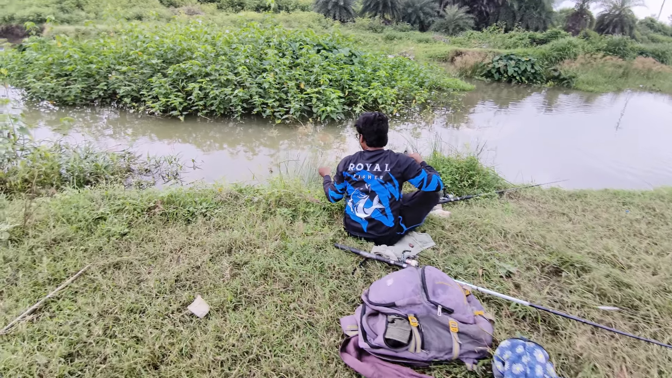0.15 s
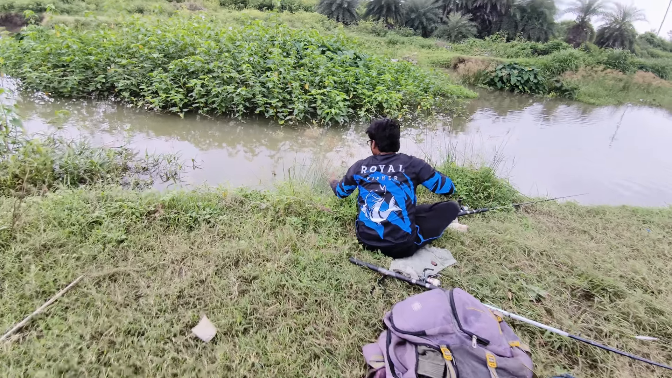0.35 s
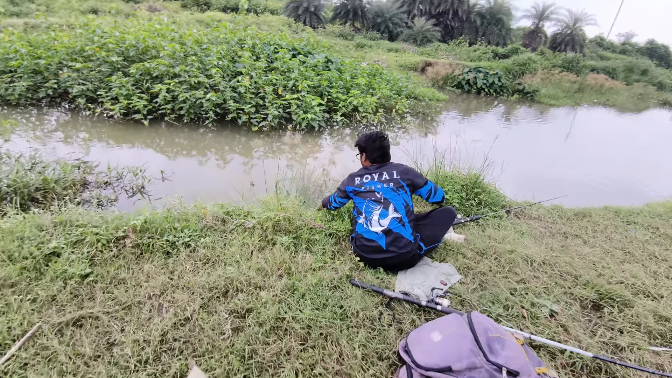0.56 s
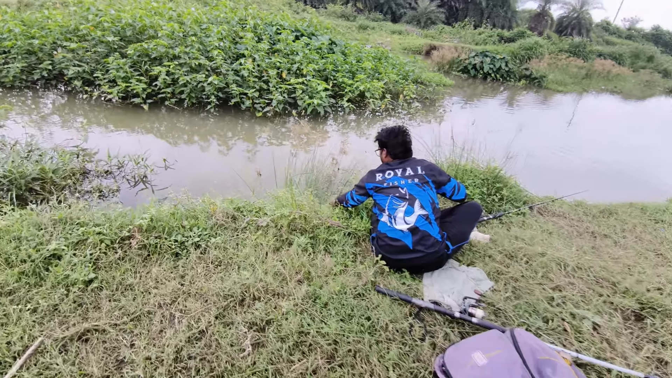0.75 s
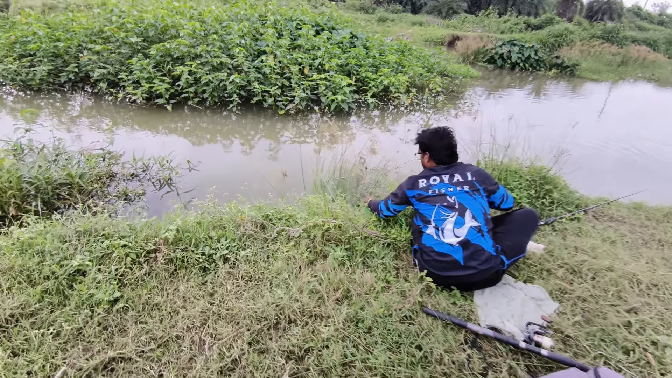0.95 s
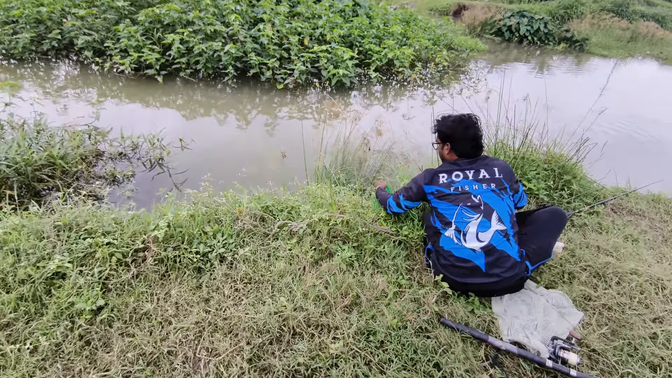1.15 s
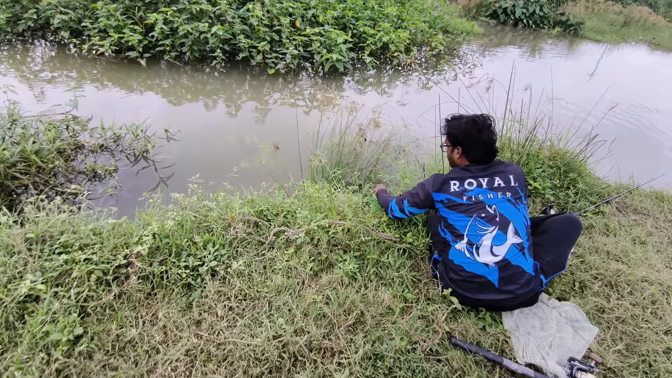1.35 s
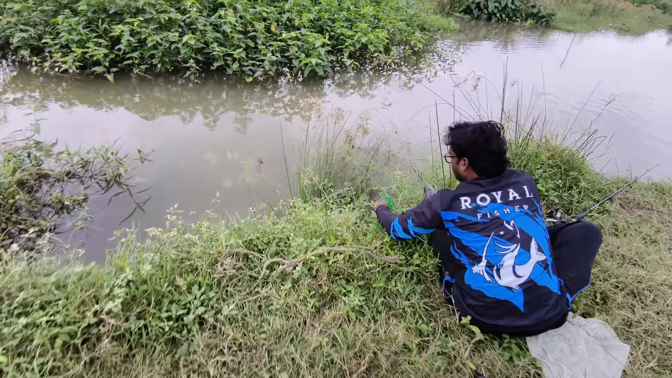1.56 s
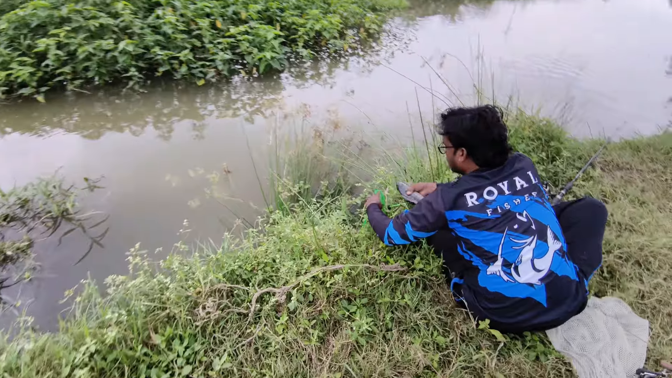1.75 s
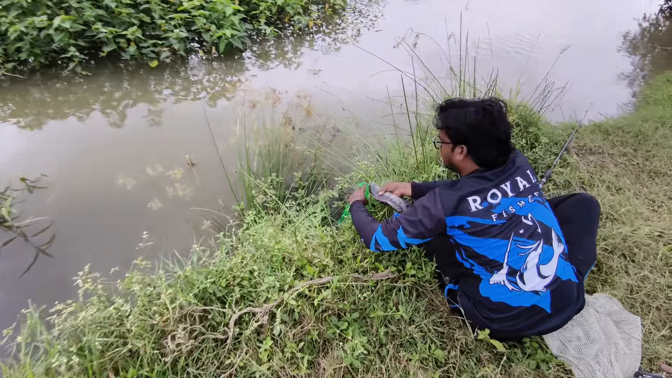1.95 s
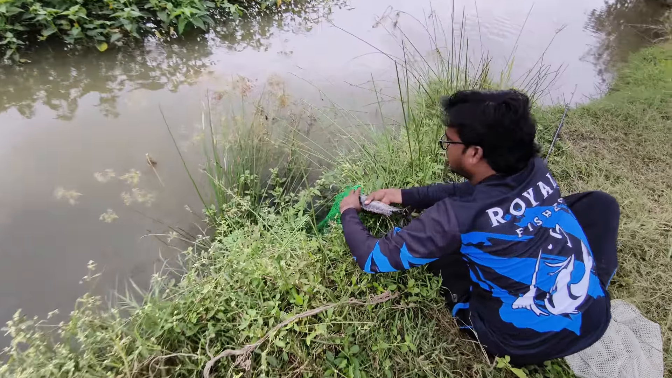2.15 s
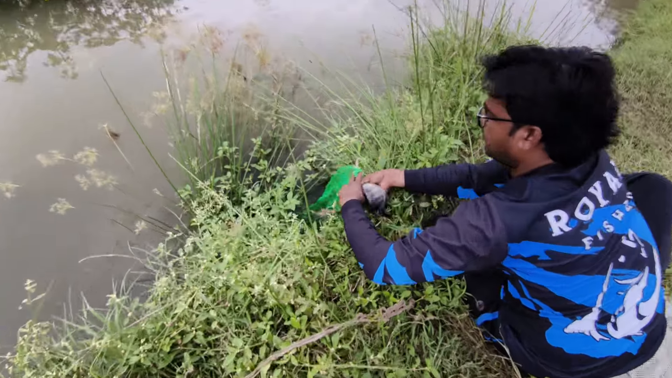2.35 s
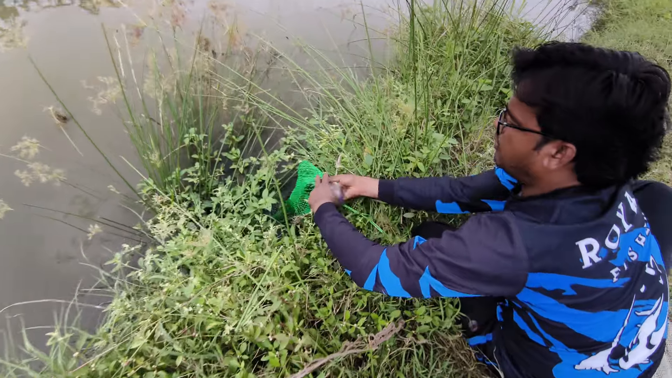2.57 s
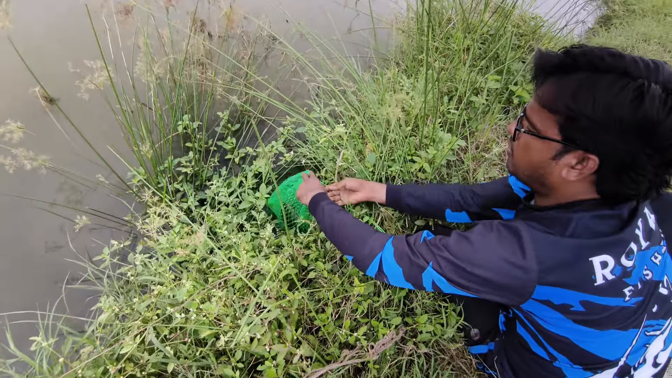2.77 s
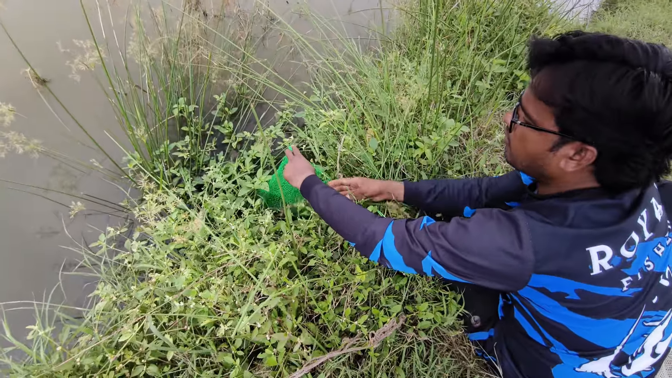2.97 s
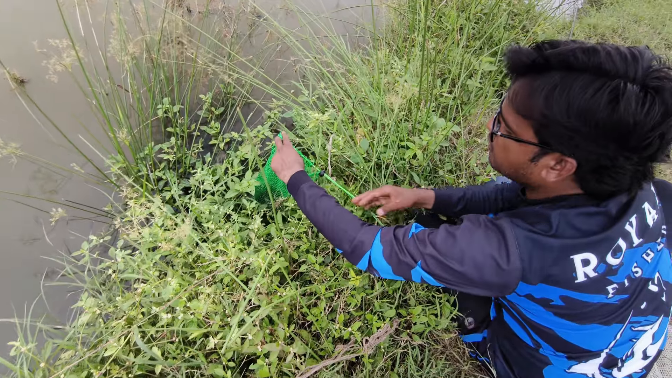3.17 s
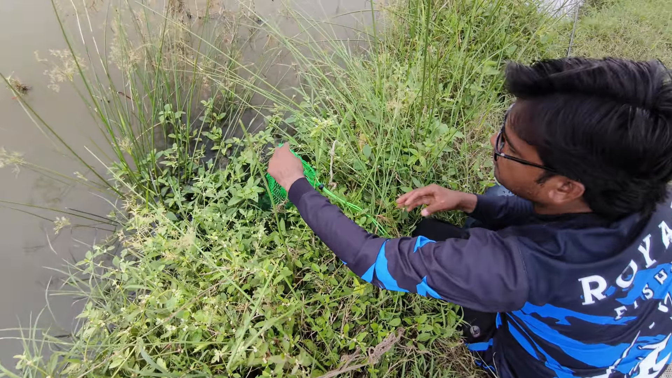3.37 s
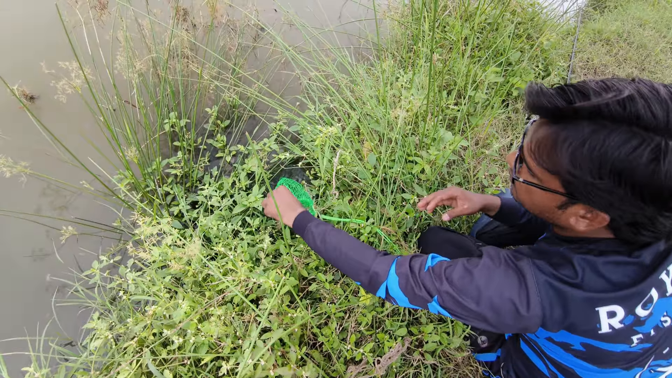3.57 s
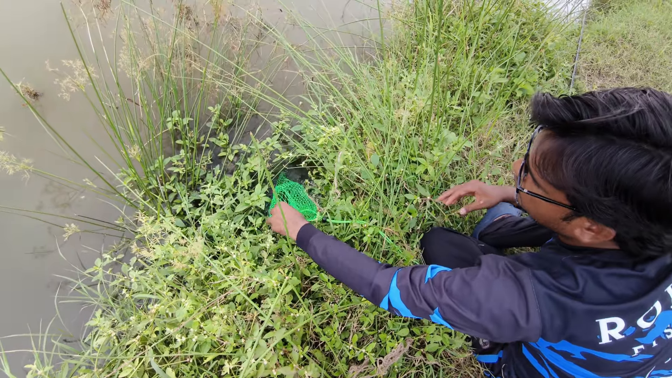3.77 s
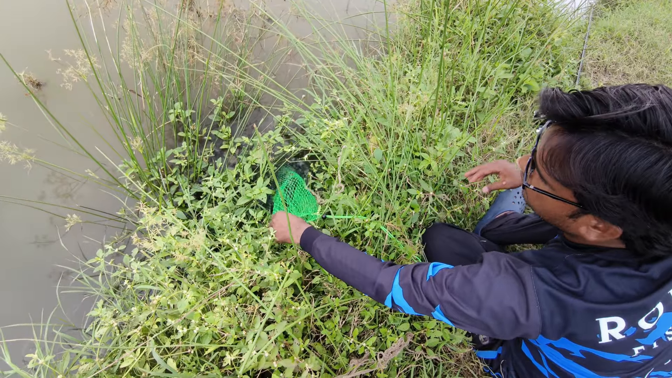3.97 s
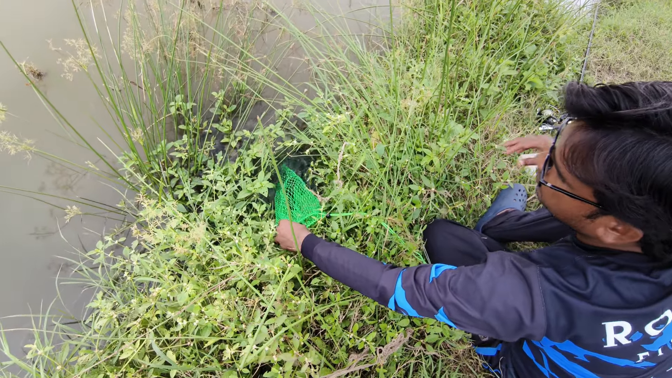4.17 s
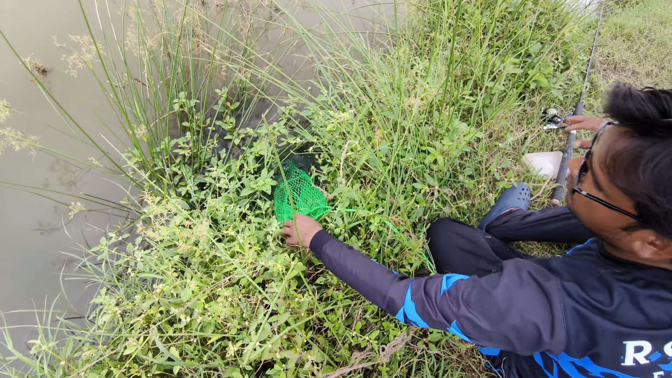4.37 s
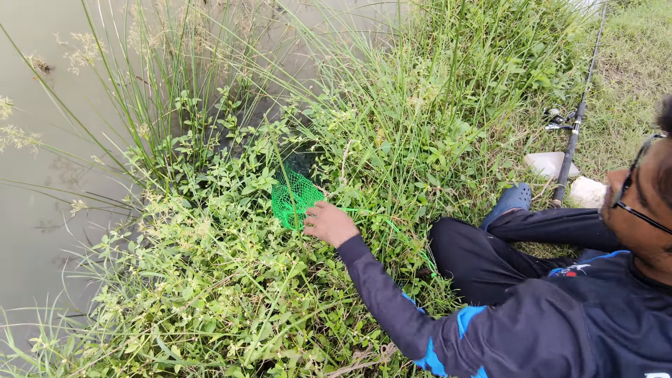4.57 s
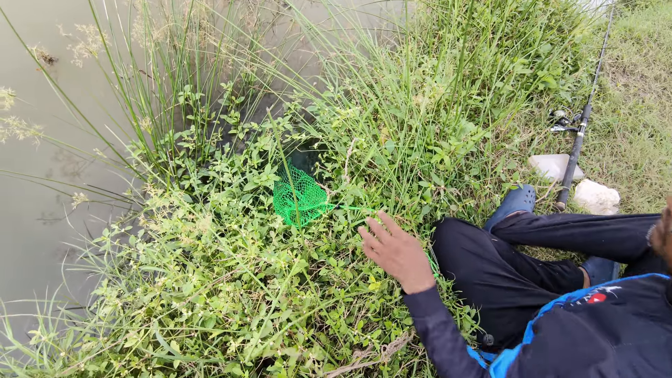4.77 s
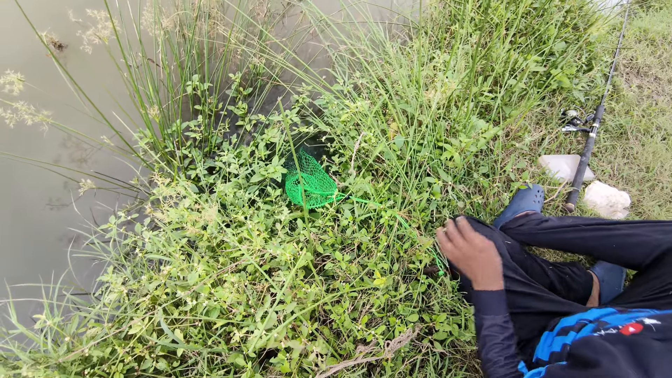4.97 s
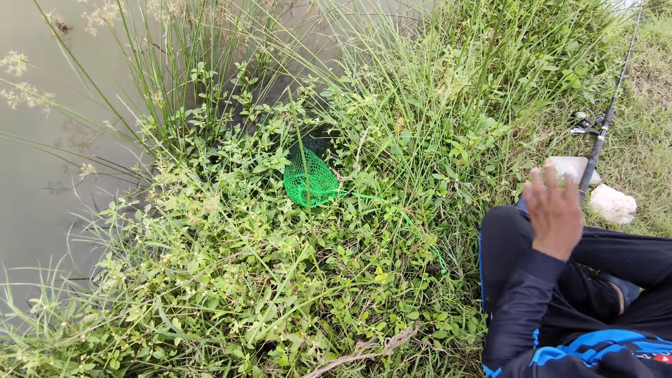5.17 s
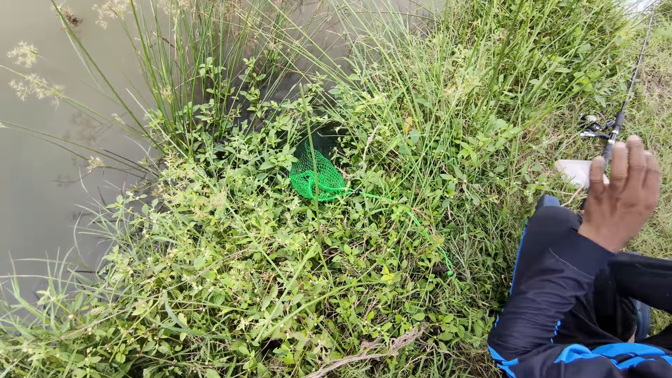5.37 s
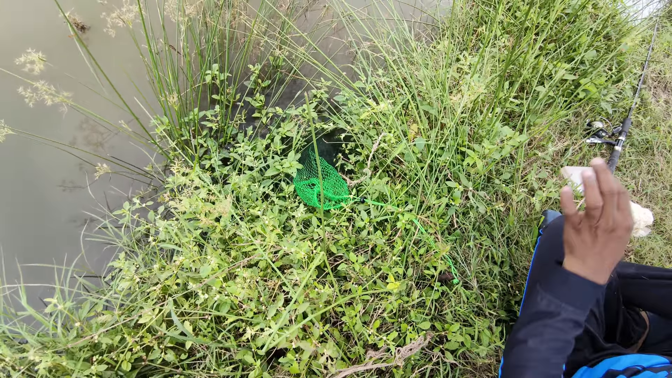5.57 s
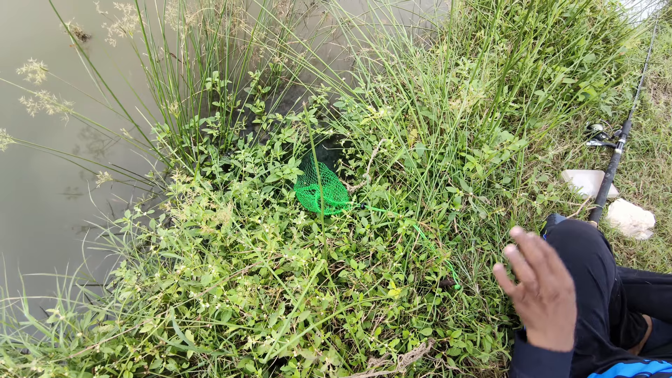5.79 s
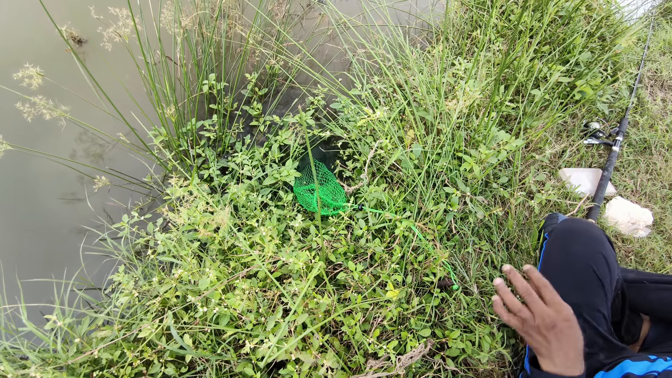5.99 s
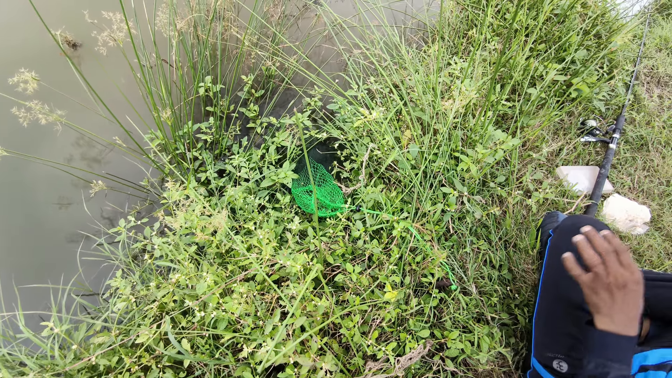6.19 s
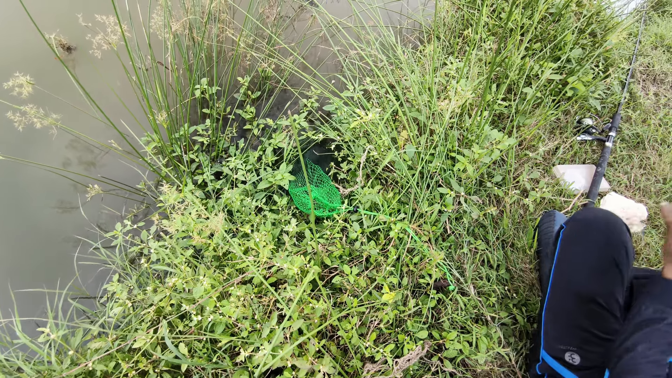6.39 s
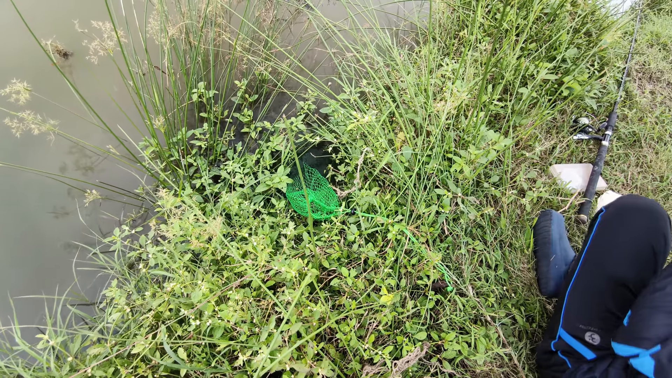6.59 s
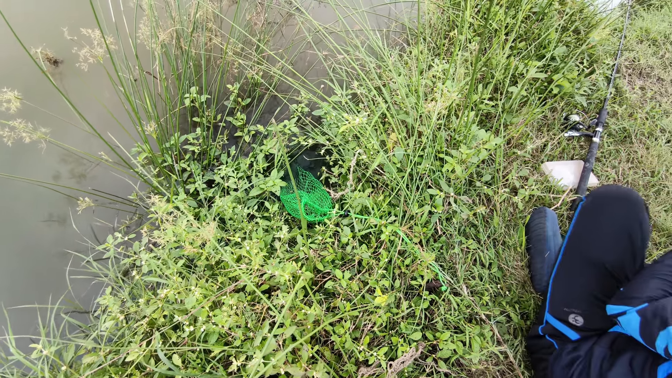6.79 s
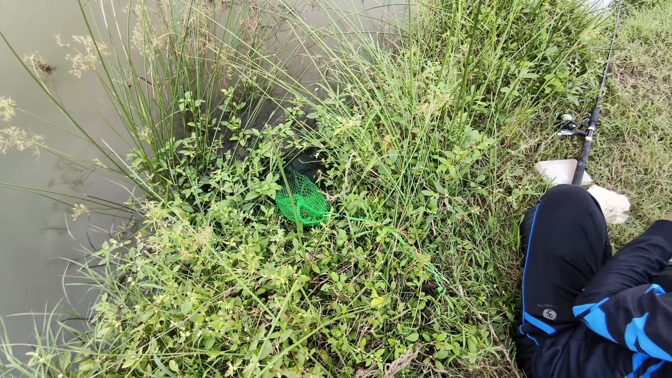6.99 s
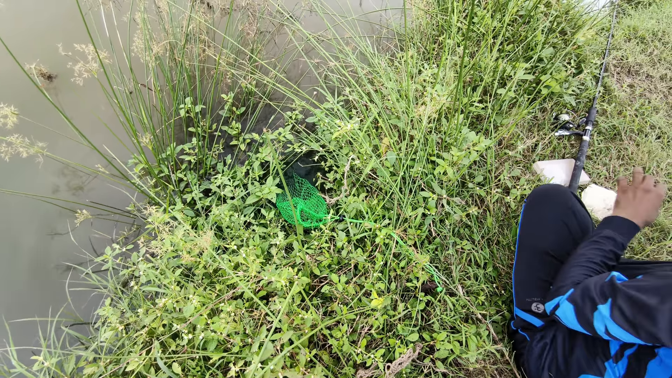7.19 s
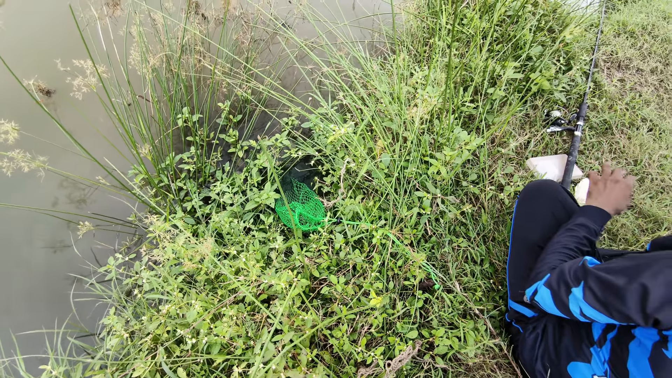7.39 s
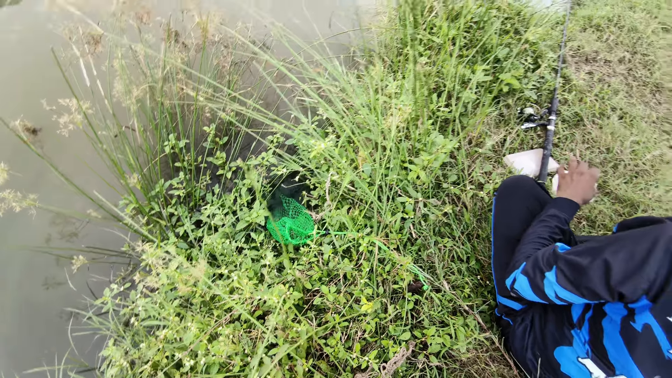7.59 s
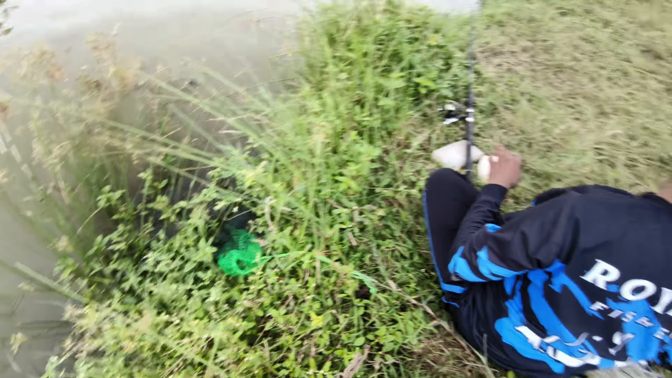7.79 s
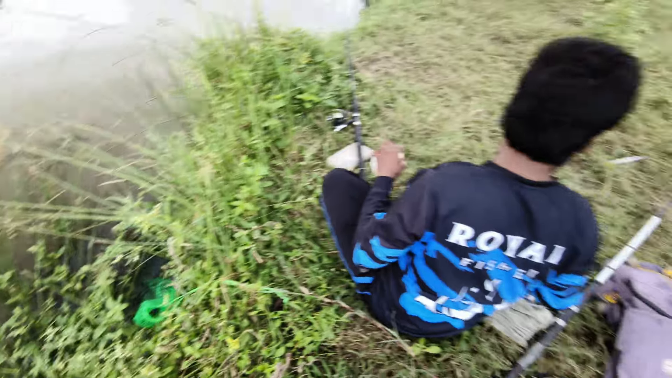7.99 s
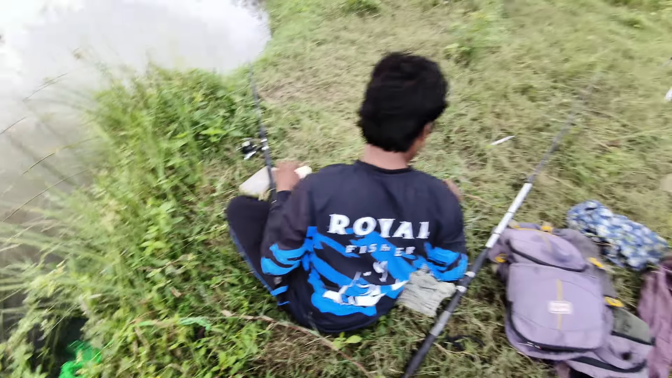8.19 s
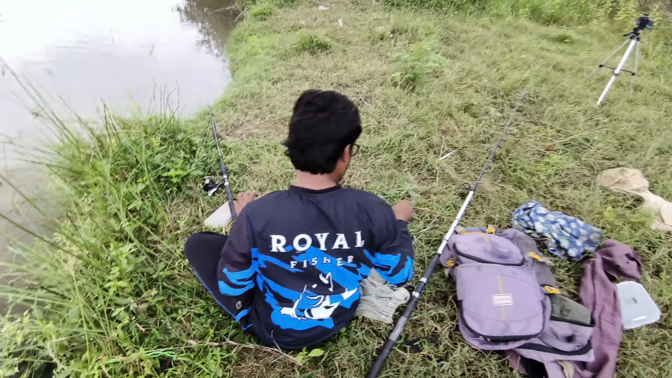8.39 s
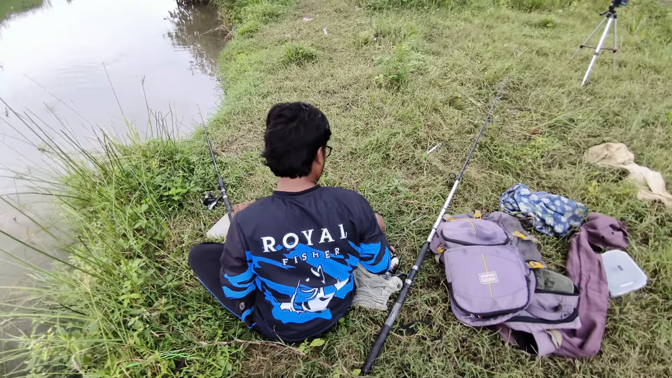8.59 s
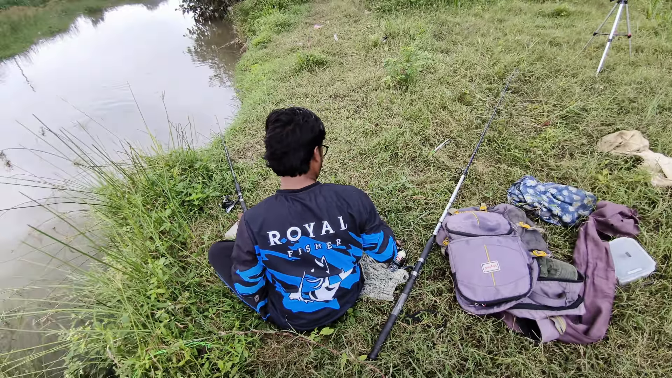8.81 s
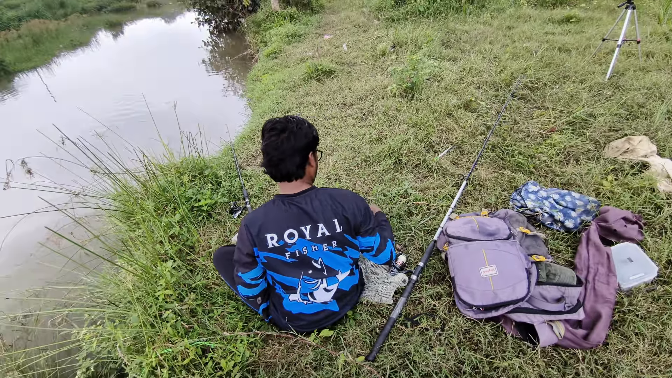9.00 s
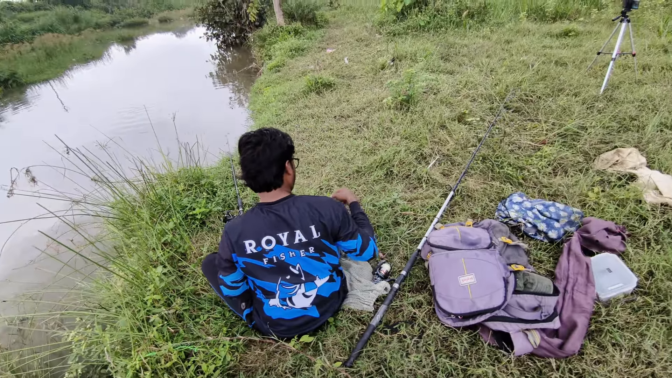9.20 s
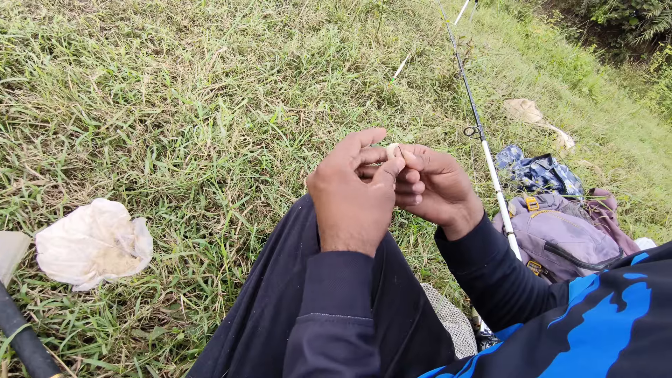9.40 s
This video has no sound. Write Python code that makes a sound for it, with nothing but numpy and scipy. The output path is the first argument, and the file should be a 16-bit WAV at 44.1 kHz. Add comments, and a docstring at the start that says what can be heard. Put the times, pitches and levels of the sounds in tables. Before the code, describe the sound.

Close sleeves swish through grass, wet slaps and bubbling splashes burst out, then pulsing cricket trills and faint bird calls continue in open air.

```python
"""Crickets trill in the grass of a pond bank, mostly to the right: close ones as gliding tones, far ones as noise.
To the left a fish slaps at a net basket (noise bursts) and splashes in the shallows (ringing bubbles, spray).
An angler's sleeves rustle the grass close by (crackling noise); stems and tackle tick.
Small birds chirp farther off (arched tones), with calls and hoots from beyond the bushes.
Light wind rumbles on the microphones under an open-air hush (shaped noise)."""
import sys
import numpy as np
from scipy import signal
from scipy.fft import rfft, irfft, next_fast_len
from scipy.io import wavfile
from scipy.ndimage import uniform_filter1d, map_coordinates

SR = 44100
rng = np.random.default_rng(int(sys.argv[2]) if len(sys.argv) > 2 else 0)


def generate_wav(sig):
    """Save sig (samples, or channels by samples) to the path in sys.argv[1] as 16-bit PCM at SR."""
    pcm = np.round(np.clip(np.atleast_2d(sig).T, -1, 1) * 32767).astype(np.int16)
    wavfile.write(sys.argv[1], SR, pcm)


N = 416744

STROKE_RATE = 26.6  # wing strokes a second
# overtones of the close crickets, which beam narrowly and come and go as the listener turns:
# t/s, level/dB added to each cricket's own overtone level
OVERTONE_BEAM = [(0, 11), (5.3, -2), (6, -2.5), (6.65, -28), (7, -7), (7.6, -2), (8.2, 14), (8.7, -2)]


def cricket(lag, pitch_hz, fall_hz, width, overtone_db, scatter_db, spread):
    """Each wing stroke is a short tone that swells, then sags in pitch and dies as the scraper stops on the file."""
    beat = STROKE_RATE * np.arange(N) / SR - lag + 0.04 * wobble(24)
    within = (beat + .5) % 1 - .5  # place in the stroke, -0.5 to 0.5
    swell = np.exp(-.5 * (within / (width * (1 - within))) ** 2)
    closing = np.abs(np.cos(np.pi * within)) ** .5  # silent between strokes
    stroke = swell * closing * amp(1.9 * wobble(25))
    hz = pitch_hz - fall_hz * np.tanh(5 * within) + 18 * wobble(60)
    rasp = .045 * wobble(2200)  # uneven teeth jitter the phase
    phase = 2 * np.pi * np.cumsum(hz) / SR + rasp
    overtone = amp(overtone_db + curves(OVERTONE_BEAM)[0]) * np.sin(2 * phase)
    return through_grass(stroke * (np.sin(phase) + overtone), scatter_db, spread)


# close crickets together, at the moving listener: t/s, level/dB
CRICKET_LEVEL = [(0.0, -52), (0.8, -57), (1.75, -51), (1.95, -56.5), (2.38, -46.5), (2.52, -52),
                 (3.15, -41), (4.45, -42), (4.85, -49), (5.5, -43.5), (5.75, -48.5), (6.55, -52.5),
                 (6.66, -54.5), (7.08, -43.5), (8.08, -45), (8.3, -54), (8.85, -51), (9.45, -64)]
# how far each cricket falls behind the common beat (negative is ahead):
# t/s, high one/cycles, middle one/cycles, low one/cycles
CRICKET_LAG = [(0, -.22, -.22, 0), (1.2, -.5, -.4, -.03), (1.8, -.8, -.1, 0), (2.6, -.8, .15, .1),
               (3.3, -1.13, -.05, .1), (4.4, -1.43, -.3, -.03), (5.3, -1.56, -.45, -.11),
               (6, -1.85, -.3, .06), (7.1, -1.9, .05, .12), (7.9, -2.02, 0, .16), (8.7, -2.15, -.15, -.12),
               (9.45, -2.18, -.18, -.15)]
# where they lie as the listener turns: t/s, left over right/dB
CRICKET_BEARING = [(0.0, -8.86), (1.3, 1), (2.3, -15.5), (3.4, -12.29), (6.0, -12), (6.6, -5.45),
                   (6.85, -12.5), (8.0, -13), (8.5, -4), (9.45, -6)]
# which one is nearest, against the middle one: t/s, high one's level/dB, low one's level/dB
CRICKET_NEARNESS = [(.45, -12, -3), (1.1, 0.5, -0.5), (1.75, 6, 12), (2.25, -15, -4), (2.95, 19, 6),
                    (3.5, 3.5, 6.5), (6.2, 1, 3), (6.6, 9.5, -1.5), (6.85, 4.5, 14.5), (7.55, -4, 6.5),
                    (8.05, -4.5, -8.5), (8.7, -9.5, -26)]
PAUSE_S, RESUME_S, PAUSE_FADE_S = 6.58, 7.12, 0.025  # the high cricket rests once


def crickets():
    """Three neighbours trill at nearly the same beat, each on its own pitch; they share the loudness by nearness."""
    level_db, = curves(CRICKET_LEVEL)
    pan_db, = curves(CRICKET_BEARING)
    high_db, low_db = curves(CRICKET_NEARNESS)
    high_lag, middle_lag, low_lag = curves(CRICKET_LAG)
    t = np.arange(N) / SR
    singing = np.clip(np.maximum(PAUSE_S - t, t - RESUME_S) / PAUSE_FADE_S + .5, 0, 1)
    high_gain, low_gain = singing * amp(high_db), amp(low_db)
    high = high_gain * cricket(high_lag, pitch_hz=7562, fall_hz=11, width=0.2,
                               overtone_db=-15.5, scatter_db=-21, spread=0.0074)
    middle = cricket(middle_lag, pitch_hz=7337, fall_hz=63.0, width=0.3,
                     overtone_db=-25.5, scatter_db=-8.0, spread=0.012)
    low = low_gain * cricket(low_lag, pitch_hz=7121, fall_hz=185, width=0.21,
                             overtone_db=-29, scatter_db=-7.5, spread=.01)
    total_gain = np.sqrt(high_gain ** 2 + 1 + low_gain ** 2)
    return amp(level_db) * (high + middle + low) / total_gain * panned(pan_db)


def through_grass(x, scatter_db, spread, count=6):
    """A direct path plus detours of up to spread/s off stems and ground, drifting as the listener moves; levelled."""
    ears = np.array([x, np.roll(x, 1)])
    for ear in ears:
        for delay in spread * (np.arange(count) + rng.random(count)) / count:
            ear += amp(scatter_db) * wobble(3) * np.roll(x, int(delay * SR))
    power = uniform_filter1d(np.mean(ears ** 2, axis=0), SR // 4)
    return ears / np.sqrt(np.abs(power) + 1e-9)


# colour of the far crickets: f/Hz, relative level/dB per Hz
CHORUS_COLOUR = [(5800, -27.5), (6500, -14.5), (7000, -2.5), (7350, -1.5), (7700, -6), (8200, -17),
                 (8900, -35.5)]


def chorus():
    """Many far crickets merge into a shimmering haze around the near ones."""
    shimmer_db = 2 * wobble(50)
    haze = coloured(patchy(rng.standard_normal((2, N)), depth_db=0.5), CHORUS_COLOUR)
    return amp(-65.0 + shimmer_db) * haze * panned(-8.0)


def fish(lead=0.00022):
    """The basket lies to the left, so its sounds reach the left microphone first (lead in s)."""
    early_left = lambda hz: np.exp(1j * np.pi * hz * lead * np.array([[1], [-1]]))
    return filtered(slaps() + water(), early_left)


# slaps of the fish against hand, grass and net, levels before the attack:
# t/s, thump level/dB, smack level/dB, crack level/dB, t60/s (thump: twice that), left over right/dB
FISH_SLAPS = [(0.537, -54.5, -46, -67, 0.12, -23), (.988, -65, -37, -36.5, 0.044, 2),
              (2.467, -58, -26.5, -27, 0.048, -4), (2.48, -32.5, -25, -23, 0.02, -1.5),
              (2.663, -37, -51, -62, 0.065, -0.5), (2.694, -49, -28, -34.5, 0.041, -6),
              (2.7, -35, -25.5, -23.5, 0.026, 4.5), (2.7759, -40, -26.5, -18.5, 0.041, 0)]
# colours of the smack, of the crack (also heard in the ticks) and of the thump:
# f/Hz, relative level/dB per Hz
SMACK_COLOUR = [(150, -60), (400, -1.5), (600, 1.5), (1000, 0), (1500, -2), (2100, -10), (4000, -17)]
CRACK_COLOUR = [(800, -46), (1900, -6), (2800, -3), (4500, 0.5), (7000, -6), (9000, -9.5), (12000, 1.5),
                (15000, -1)]
THUMP_COLOUR = [(25, -22), (80, -3), (170, 10), (260, -13), (450, 5.5), (1200, -38)]


def slaps():
    """The wet body hits net and hand: a low thump, a smack and a bright crack, each a decaying noise burst."""
    out, t = np.zeros((2, N)), np.arange(SR // 5) / SR
    burst = lambda colour: coloured(rng.standard_normal((2, len(t))), colour, CLOSE_LIKENESS)
    for s, thump_db, smack_db, crack_db, t60, pan_db in FISH_SLAPS:
        blow = amp(-60 * t / t60) * (1 - np.exp(-t / 0.00095))
        push = amp(-30 * t / t60) * (1 - np.exp(-t / 0.0035))
        smack = blow * amp(smack_db) * burst(SMACK_COLOUR)
        crack = blow * amp(crack_db) * burst(CRACK_COLOUR)
        thump = push * amp(thump_db) * burst(THUMP_COLOUR)
        add(out, s, panned(pan_db) * (smack + crack + thump))
    # the heaviest flap lands with a hollow thud
    add(out, 2.7, amp(-22.5) * bubble(hz=194, t60=0.047, rise=-0.15))
    return out


# tail beats in the water: t/s of the peak, relative level/dB, rise/s, fall/s
TAIL_BEATS = [(3.14, -45, 0.036, 0.015), (3.21, -49, 0.013, 0.013), (3.29, -51, 0.017, 0.039),
              (3.34, -53, 0.017, 0.012), (3.4, -47.5, 0.016, 0.014), (3.55, -47.5, 0.026, 0.027),
              (3.63, -57, 0.036, 0.026), (3.675, -40.5, 0.011, .04), (3.76, -36, 0.031, 0.051),
              (3.84, -47.5, 0.045, 0.12), (3.99, -61.5, 0.017, 0.058), (4.123, -52.5, 0.018, 0.051),
              (4.21, -47, 0.024, 0.043), (4.27, -49, 0.028, 0.067)]
# colour of spray and churn: f/Hz, relative level/dB per Hz
SPRAY_COLOUR = [(250, -54), (480, -2), (1000, 3), (1600, 12.5), (2100, -4), (3500, -2.5), (5500, -14),
                (9000, -24.5)]


def water(count=620):
    """The fish thrashes in the basket: tail beats throw spray and small bubbles among the large gulps."""
    out, churn = gulps() + squelches(), swells(TAIL_BEATS)
    first, last = TAIL_BEATS[0][0] - .1, TAIL_BEATS[-1][0] + 0.092
    for when, size, loud, side in rng.random((count, 4)):
        s, hz = first + when * (last - first), 620 * 6 ** size
        strength = churn[int(s * SR)] * amp(14 * loud ** 2 - 4 * size - 6)
        add(out, s, strength * panned(10 * (side - .5)) * bubble(hz, 42 / hz, rise=0.385))
    drops = patchy(crackle(rate=530, grain_db=4), depth_db=8.5)
    spray = churn * amp(-3.5) * coloured(drops, SPRAY_COLOUR, CLOSE_LIKENESS)
    return out + spray + amp(-18) * echo(out.mean(axis=0))


# the largest air pockets that ring in the water: t/s, relative level/dB, f/Hz at the start
AIR_POCKETS = [(3.139, -38.5, 1290), (3.161, -26.5, 2400), (3.2, -20, 2190), (3.227, -52, 506),
               (3.285, -40, 1430), (3.307, -46, 660), (3.368, -24, 2600), (3.374, -46.5, 696),
               (3.407, -55, 363), (3.443, -30, 2300), (3.637, -35, 2200), (3.667, -36.5, 530),
               (3.674, -35.5, 980), (3.729, -43, 540), (3.832, -40.5, 537), (3.85, -43, 592),
               (3.875, -48, 680), (4.048, -53.5, 295.6)]
RING_CYCLES, LONGEST_RING_S = 57, 0.12  # a pocket's t60 is this many cycles of its pitch, up to the longest


def gulps():
    """Large air pockets ring in the water, each at a random place left or right."""
    out = np.zeros((2, N))
    for s, db, hz in AIR_POCKETS:
        t60 = min(RING_CYCLES / hz, LONGEST_RING_S)
        add(out, s, amp(db + 4) * panned(rng.standard_normal()) * bubble(hz, t60, rise=0.3))
    return out


# cavities that close behind the fish: t/s, length/s, f/Hz at the start, level/dB
CAVITIES = [(3.251, .04, 565, -53.5), (3.318, 0.031, 1010, -49.5), (3.516, 0.05, 854, -49.5),
            (3.725, 0.024, 800, -51), (4.241, .042, 572, -42), (4.259, 0.028, 1057, -45.5)]
SQUELCH_RISE = 1.65  # end pitch over start pitch


def squelches():
    """Closing cavities give short wavering tones that rise in pitch."""
    out = np.zeros(N)
    for s, length, hz, db in CAVITIES:
        tone = note(length, hz, hz * SQUELCH_RISE ** 0.394, hz * SQUELCH_RISE, waver=0.038)
        add(out, s, amp(db) * tone)
    return out


def bubble(hz, t60, rise):
    """An air pocket rings while its pitch climbs by the fraction rise within t60 (negative rise: it sinks)."""
    t = np.arange(int(t60 * SR) + 2) / SR
    tone = np.sin(2 * np.pi * hz * t * (1 + rise * t / t60 / 2))
    return tone * amp(-60 * t / t60) * (1 - np.exp(-t / 0.0017))


# strokes of sleeves and legs through the grass, close to the microphones:
# t/s of the peak, swish relative level/dB, rub relative level/dB, rise/s, fall/s
GRASS_STROKES = [(.05, -62.5, -72.5, 0.27, 0.53), (.33, -63, -73.5, 0.14, 0.28),
                 (.51, -57.5, -58.5, 0.087, 0.058), (.63, -57.5, -63.5, 0.062, 0.1),
                 (.78, -58.5, -71.5, 0.057, 0.068), (1.008, -49.5, -50.5, 0.036, 0.086),
                 (1.16, -62, -63, 0.023, 0.054), (1.31, -71, -70.5, 0.061, 0.081),
                 (1.629, -46.5, -50, 0.062, 0.069), (1.75, -51.5, -56.5, 0.047, 0.066),
                 (1.9, -64, -68, 0.041, 0.073), (2.23, -49, -52.5, 0.044, 0.071),
                 (2.43, -58, -63, 0.16, 0.2), (2.68, -59, -56, 0.084, 0.067), (2.85, -52, -57, 0.22, 0.1),
                 (3.02, -56.5, -55, 0.028, .04), (3.119, -51, -65, 0.036, 0.1),
                 (3.33, -61, -62.5, 0.32, 0.23), (3.63, -54.5, -54, 0.053, 0.039),
                 (3.78, -59, -64, 0.1, 0.096), (4.2, -68.5, -82, 0.12, 0.18), (5.47, -68.5, -63, .17, 0.13),
                 (7.95, -75, -74, .17, 0.16), (8.56, -76, -69, 0.17, .1), (8.8, -54, -59, 0.2, .12),
                 (9.31, -72.5, -68.5, 0.062, 0.055)]
# slow shifts of the whole body under the strokes: same columns
BODY_SHIFTS = [(3, -75, -75.5, 5.7, 2.66), (8.4, -79.5, -80.5, 0.86, 1.5)]
# colours of the fine swish and of the duller rub: f/Hz, relative level/dB per Hz
SWISH_COLOUR = [(1500, -27), (3000, -14.5), (4800, -5), (6300, -13), (9500, -6.5), (10800, -8.5),
                (12500, -0.5), (15500, -1)]
RUB_COLOUR = [(100, -22.5), (300, -14.5), (700, -3), (1080, 1.5), (1330, 0), (1640, 4.5), (1980, 0),
              (2600, 3.5), (3600, -8), (5000, -7), (6500, -9.5), (9000, -27.5), (15000, -39)]


def rustle():
    """Fibres slip over each other: each stroke swells a fine high swish and a duller rub, both fluttering."""
    s, swish_db, rub_db, rise, fall = np.transpose(GRASS_STROKES + BODY_SHIFTS)
    flutter_db = .9 * wobble(45)
    fine = coloured(patchy(crackle(rate=900, grain_db=-7.5), depth_db=4.5), SWISH_COLOUR)
    dull = coloured(patchy(crackle(rate=270, grain_db=-7), depth_db=5.0), RUB_COLOUR)
    swish = swells(zip(s, swish_db, rise, fall)) * amp(flutter_db + 9) * fine
    rub = swells(zip(s, rub_db, rise, fall)) * amp(flutter_db + 4.5) * dull
    return swish + rub


# weight settling on the soft turf: t/s of the peak, level/dB, rise/s, fall/s
TURF_TREADS = [(.53, -62.5, .08, 0.091), (1.66, -73, 0.049, 0.14), (2.22, -74, 0.064, .08),
               (2.88, -70, 0.059, .1), (8.85, -65, 0.11, 0.17)]
# colour of the scuff: f/Hz, relative level/dB per Hz
TURF_COLOUR = [(90, -20.5), (180, -10), (270, -3), (370, 3), (480, -3.5), (900, -20)]


def treads():
    """Feet and seat press the turf, which answers with a low, soft scuff."""
    return swells(TURF_TREADS) * coloured(crackle(rate=89, grain_db=-5), TURF_COLOUR, CLOSE_LIKENESS)


# small ticks of stems and tackle: t/s, relative level/dB, f/Hz of the resonance
STEM_TICKS = [(1.992, -51.5, 2700), (2.1804, -44.5, 1470), (3.035, -48.5, 4600), (3.106, -38, 6500),
              (3.217, -37, 4130), (3.7555, -38.5, 1550), (3.7645, -40.5, 3760), (3.776, -48, 1530),
              (3.818, -44, 1190), (4.1185, -46.5, 4650), (4.9363, -62.5, 1870), (5.074, -53.5, 5500),
              (7.332, -49.5, 2190), (8.1646, -59.5, 1750), (9.335, -47.5, 3130)]


def ticks():
    """Short dry snaps: a bright crack together with one briefly ringing resonance."""
    out, t = np.zeros((2, N)), np.arange(SR // 20) / SR
    for s, db, hz in STEM_TICKS:
        peak = [(hz / 3, -30), (hz / 1.4, -8), (hz, 0), (hz * 1.2, -8), (hz * 1.6, -28), (hz * 4, -50)]
        ring = coloured(rng.standard_normal((2, len(t))), peak, CLOSE_LIKENESS)
        crack = coloured(rng.standard_normal((2, len(t))), CRACK_COLOUR)
        add(out, s, amp(db - 2.5 - 60 * t / 0.041) * ring + amp(db - 10 - 60 * t / .012) * crack)
    return out


# a small bird's falling chips: t/s of the main note, relative level/dB, lead-in note against it/dB
BIRD_CHIPS = [(1.3573, -55, -7), (1.901, -57.5, 1), (3.98, -56.5, -3), (4.234, -61, 0), (5.487, -59.5, -9),
              (5.687, -58, -14), (5.902, -57.5, -7), (6.186, -57, -4), (6.6914, -59, -10),
              (7.164, -58.5, 0.5), (7.51, -60, -3.5), (8.531, -55, -4), (9.2726, -54.5, -19)]
CHIP_GAP_S = .048  # from the lead-in note to the main note
# a second bird's run of steep high notes slows and fades as it goes
RUN_START_S, RUN_STEP_S, RUN_SLOWING_S = 3.484, .0955, .0009
RUN_DB, RUN_FADE_DB = -51, .5  # first note before panning, loss a note
# a third bird's short dipping slurs: t/s, length/s, level/dB before panning
BIRD_SLURS = [(2.019, .058, -62), (6.53, 0.049, -63.5), (6.875, 0.036, -63), (7.208, .035, -62),
              (8.151, 0.0243, -62), (8.276, 0.0244, -64.5), (9.27, 0.041, -65)]
# single whistles: t/s, length/s, start f/Hz, middle f/Hz, end f/Hz, relative level/dB
BIRD_WHISTLES = [(2.579, 0.1, 3150, 2546, 2370, -60.5), (5.79, 0.064, 2546, 2372, 2395, -55.5),
                 (6.032, 0.21, 2120, 2056, 1760, -64), (6.571, 0.15, 3460, 3650, 3430, -63.5)]


def near_birds(run_notes=10):
    """Nearer birds to the right sing gliding notes, heard directly with an echo from the bushes."""
    near = np.zeros(N)
    for s, db, lead_db in BIRD_CHIPS:
        for start, note_db in (s - CHIP_GAP_S, db + lead_db), (s, db):
            add(near, start, amp(note_db - 0.5) * note(0.039, 3340, 3145, 2766, waver=0.017))
    for k in range(run_notes):
        start = RUN_START_S + k * (RUN_STEP_S + k * RUN_SLOWING_S)
        add(near, start, amp(RUN_DB - k * RUN_FADE_DB) * note(0.049, 6280, 4890, 4708))
    for s, length, db in BIRD_SLURS:
        add(near, s, amp(db) * note(length, 4620, 4000, 3830, waver=0.0089))
    for s, length, start_hz, middle_hz, end_hz, db in BIRD_WHISTLES:
        add(near, s, amp(db + 2.0) * note(length, start_hz, middle_hz, end_hz))
    return near * panned(-13) + amp(-3.5) * echo(near)


# distant nasal bird calls: t/s, length/s, f/Hz at the top of the arch,
# relative levels/dB of harmonics 2, 3 and 4
DISTANT_CALLS = [(5.216, 0.33, 653, -62, -65, -67), (8.181, 0.28, 666.5, -51.5, -73, -57.5),
                 (9.308, 0.3, 592, -66, -59, -60)]
# far hoots: t/s, relative level/dB
FAR_HOOTS = [(7.327, -62), (7.398, -66), (7.498, -59.5), (7.627, -67), (8.919, -58.5), (9.006, -53.5),
             (9.097, -54), (9.241, -53)]


def far_birds():
    """Distant calls and hoots reach the microphones both directly and as an echo from the bushes."""
    far = np.zeros(N)
    for s, length, hz, *harmonic_db in DISTANT_CALLS:
        add(far, s, amp(-3.0) * cry(length, hz, harmonic_db))
    for s, db in FAR_HOOTS:
        add(far, s, amp(db - 7.5) * note(0.0695, 804, 863, 766, waver=0.0097))
    return amp(-1.5) * far + amp(-5.0) * echo(far)


CRY_ARCH = .91  # pitch at both ends over that at the top
CRY_ROUGH_DB, CRY_FADE_DB = 3, 6  # each call rasps and loses strength towards its end


def cry(length, hz, harmonic_db):
    """A hoarse, arched call of several harmonics."""
    tone = note(length, CRY_ARCH * hz, hz, CRY_ARCH * hz, enumerate(harmonic_db, 2), waver=0.0091)
    rough_db = CRY_ROUGH_DB * wobble(181)[:len(tone)]
    return tone * amp(rough_db - CRY_FADE_DB * np.linspace(0, 1, len(tone)))


def note(length, start_hz, middle_hz, end_hz, harmonics=((1, 0),), waver=0.0011):
    """A whistle that swells and fades along an arc through three pitches."""
    u = np.linspace(0, 1, int(length * SR))
    hz = np.polyval(np.polyfit([0, .5, 1], [start_hz, middle_hz, end_hz], 2), u)
    drift = map_coordinates(rng.standard_normal(64), [u * length * 120], mode="mirror")
    phase = 2 * np.pi * np.cumsum(hz * (1 + waver * drift)) / SR
    tone = sum(amp(db) * np.sin(k * phase) for k, db in harmonics)
    return np.abs(np.sin(np.pi * u)) ** 0.52 * tone


def twitters(count=30):
    """A flock deep in the bushes breaks into a flurry of faint, quick slurs around 6.8 s."""
    out = np.zeros(N)
    for (pitch, slope, loud), when in zip(rng.random((count, 3)), rng.standard_normal(count)):
        hz, fall = 3500 * 1.55 ** pitch, 0.18 * slope
        slur = note(0.022, hz * (1 + fall), hz, hz * (1 - fall / 2), waver=0.015)
        add(out, 6.8 + .5 * when, amp(-73 + 6.0 * loud) * slur)
    return out * panned(-35) + amp(-4) * echo(out)


# echo from the bushes: f/Hz, t60/s
BUSH_DECAY = [(200, 0.13), (2500, 0.16), (6000, 0.22), (12000, 0.042)]


def echo(x):
    """The bushes' diffuse stereo answer; each frequency dies at its own speed."""
    hz, t, z = signal.stft(rng.standard_normal((2, SR // 2)), SR, nperseg=256)
    decay = amp(-60 * t / along(BUSH_DECAY, hz)[:, None])
    tail = signal.istft(z * decay, SR, nperseg=256)[1]
    return signal.fftconvolve(x[None], tail / np.linalg.norm(tail[0]), axes=1)[:, :N]


# colour of the open-air hush: f/Hz, relative level/dB per Hz
HUSH_COLOUR = [(20, -29), (45, -14), (75, 5), (130, -1), (250, -5), (500, -7), (1000, -12.5), (2500, -15),
               (5000, -16.5), (9000, -37.5), (15000, -25)]
# puffs of wind on the microphones: t/s of the peak, relative level/dB, rise/s, fall/s
WIND_PUFFS = [(.7, -61, 0.18, 0.19), (1.28, -67, .12, 0.18), (2.33, -66, 0.1, 0.11), (5.74, -70, 0.25, .2),
              (7.24, -74, .15, 0.22), (8.3, -66, 0.5, 0.27)]
CALM_DB = -76  # rumble between the puffs, on the same relative scale


def air():
    """The open-air hush, and light wind rumbling below it in puffs."""
    hush = amp(-72.5) * coloured(rng.standard_normal((2, N)), HUSH_COLOUR)
    rumble_colour = [(20, -23), (65, 4.5), (130, -3.5), (300, -16), (1000, -30)]
    rumble = coloured(rng.standard_normal((2, N)), rumble_colour)
    wind = np.hypot(amp(CALM_DB), swells(WIND_PUFFS))
    return hush + wind * amp(4.0 * wobble(11) - 5.0) * rumble


def crackle(rate, grain_db):
    """Stereo noise with sparse snaps of uneven size on top, rate of them a second."""
    snaps = (rng.random(N) < rate / SR) * rng.exponential(size=N) * rng.standard_normal((2, N))
    return rng.standard_normal((2, N)) + amp(grain_db) * unit(snaps)


def patchy(pair, depth_db):
    """Strengthen and weaken small regions of time and pitch."""
    z = signal.stft(pair, nperseg=512)[2]
    field = uniform_filter1d(rng.standard_normal(z.shape[1:]), size=5, axis=0)
    field = uniform_filter1d(field, size=9, axis=1)
    return signal.istft(z * amp(depth_db * unit(field)), nperseg=512)[1][:, :N]


SWELL_SHAPE = 1.51  # 1 = pointed, 2 = rounded


def swells(rows):
    """Joint amplitude of (t/s, level/dB, rise/s, fall/s) swells; rise and fall are the times for 10 dB."""
    t, power = np.arange(0, N, 32) / SR, 1e-14
    for s, db, rise, fall in rows:
        away = np.abs((t - s) / np.where(t < s, rise, fall))
        power = power + amp(db - 10 * away ** SWELL_SHAPE) ** 2
    return np.interp(np.arange(N) / SR, t, np.sqrt(power))


# likeness of the two microphones, for sounds around and for sounds close by:
# f/Hz, left-right likeness (1 = mono)
OPEN_LIKENESS = [(30, 0.97), (150, 0.44), (600, 0.5), (1500, 0.13), (4000, 0.027), (12000, .05)]
CLOSE_LIKENESS = [(30, 0.5), (150, .99), (600, 1), (1500, 0.76), (4000, 0.27), (12000, 0.29)]


def coloured(pair, spectrum, alike=OPEN_LIKENESS):
    """Two unrelated signals become a stereo sound of rms 1, as alike left and right as the table says."""
    turn = lambda hz: np.arccos(np.clip(along(alike, hz), -1, 1)) / 2
    response = lambda hz: amp(along(spectrum, hz)) * [np.cos(turn(hz)), np.sin(turn(hz))]
    mid, side = filtered(pair, response)
    return unit(np.array([mid + side, mid - side]))


def panned(pan_db):
    """Left and right gains of constant power; positive leans left."""
    gains = amp(np.array([np.atleast_1d(pan_db), -np.atleast_1d(pan_db)]) / 2)
    return gains / np.sqrt(np.mean(gains ** 2, axis=0))


def filtered(x, response):
    """x times a response of frequency."""
    n = x.shape[-1]
    m = next_fast_len(n + 8192)
    return irfft(rfft(x, m) * response(np.fft.rfftfreq(m, 1 / SR)), m)[..., :n]


def wobble(rate):
    """A smooth random curve, rate knots a second."""
    knots = rng.standard_normal(int(N * rate / SR) + 4)
    grid = np.arange(0, len(knots) - 1, 1 / 8)
    return np.interp(np.arange(N) * rate / SR, grid, map_coordinates(knots, [grid]))


def curves(rows):
    """One value per sample for each column after the time."""
    s, *cols = np.transpose(rows)
    return [np.interp(np.arange(N) / SR, s, c) for c in cols]


def along(points, hz):
    """(f/Hz, value) points read on a log frequency axis."""
    f, v = np.transpose(points)
    return np.interp(np.log(hz + 1), np.log(f + 1), v)


def add(track, s, sound):
    """Mix a sound into the track at time s."""
    part = track[..., max(round(s * SR), 0):][..., :sound.shape[-1]]
    part += sound[..., :part.shape[-1]]


def amp(db):
    """Decibels to gain."""
    return 10 ** (np.asarray(db) / 20)


def unit(x):
    """Scale to rms 1."""
    return x / np.sqrt(np.mean(x ** 2) + 1e-20)


def scene():
    """Everything on the bank, from the crickets to the open air."""
    insects = crickets() + chorus()
    angling = fish() + rustle() + treads() + ticks()
    birds = near_birds() + far_birds() + twitters()
    return insects + angling + birds + air()


TOP_HZ = 15830  # upper band limit


def record(dry):
    """The microphone channel passes nothing above its band limit."""
    return filtered(dry, lambda hz: hz < TOP_HZ)


dry = scene()
out = record(dry)
generate_wav(out)
```